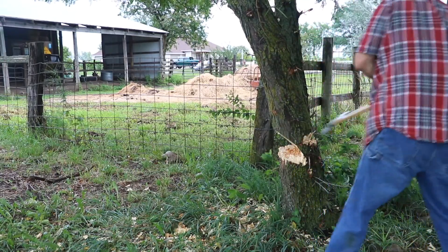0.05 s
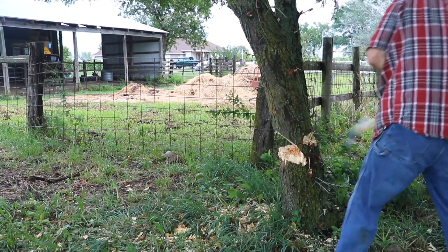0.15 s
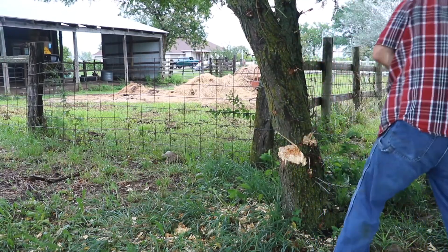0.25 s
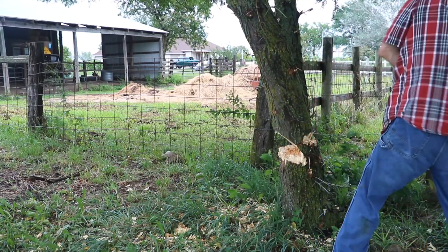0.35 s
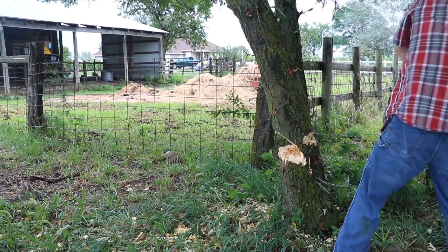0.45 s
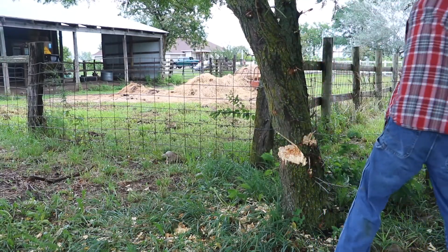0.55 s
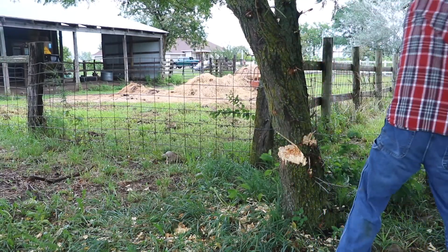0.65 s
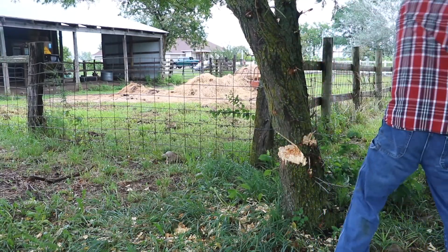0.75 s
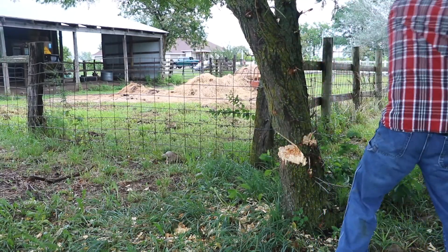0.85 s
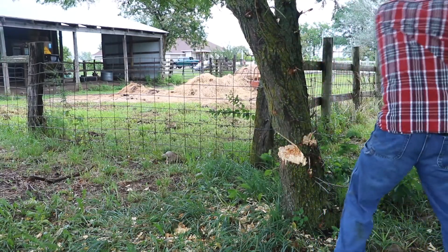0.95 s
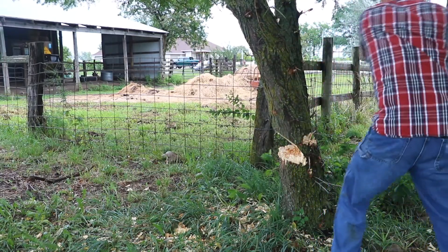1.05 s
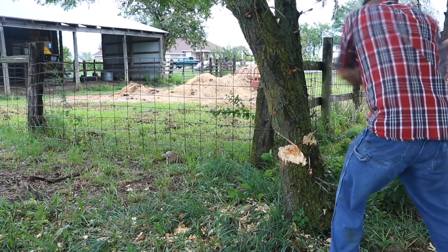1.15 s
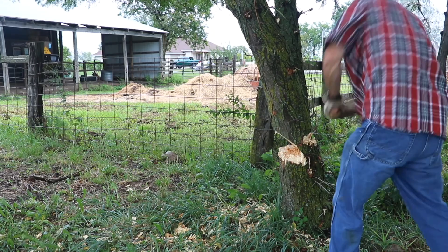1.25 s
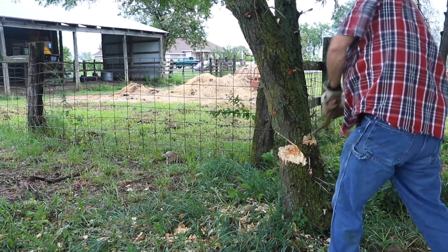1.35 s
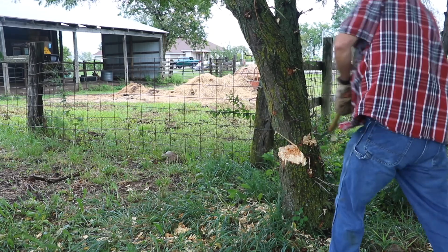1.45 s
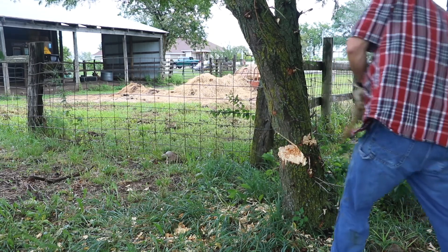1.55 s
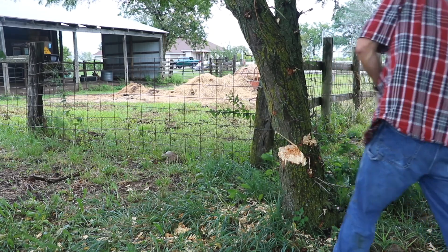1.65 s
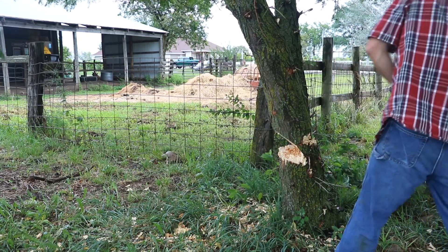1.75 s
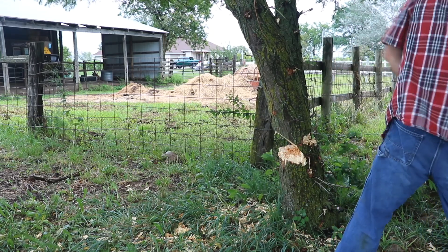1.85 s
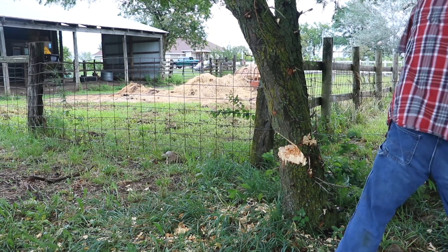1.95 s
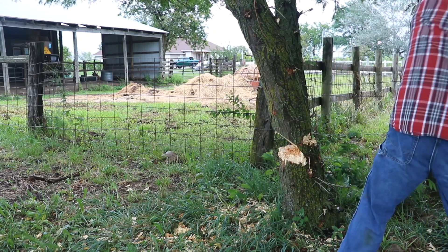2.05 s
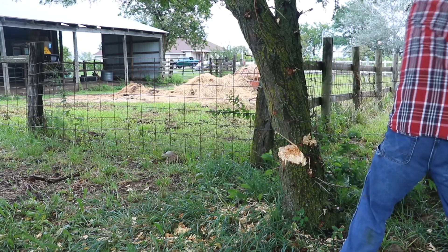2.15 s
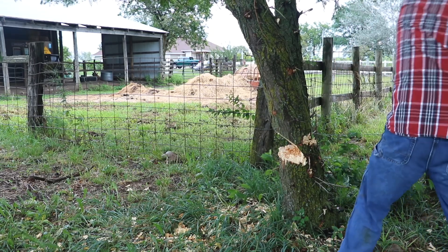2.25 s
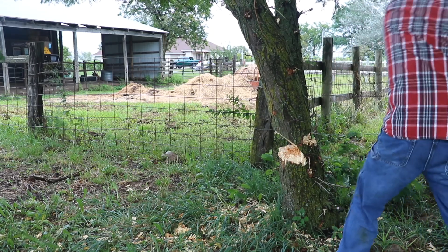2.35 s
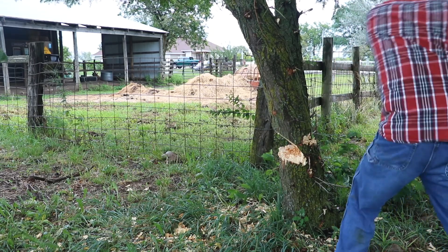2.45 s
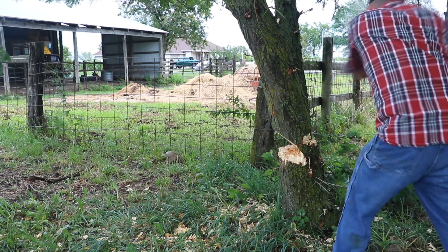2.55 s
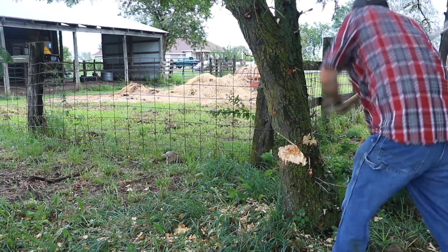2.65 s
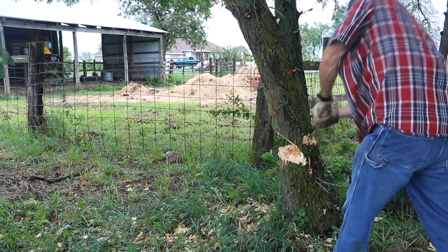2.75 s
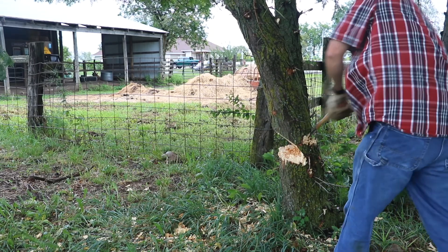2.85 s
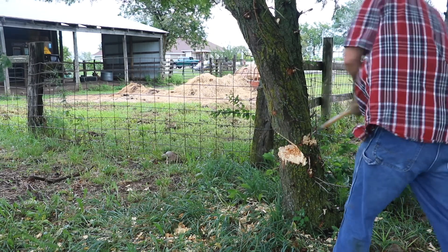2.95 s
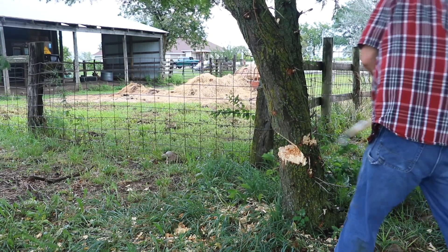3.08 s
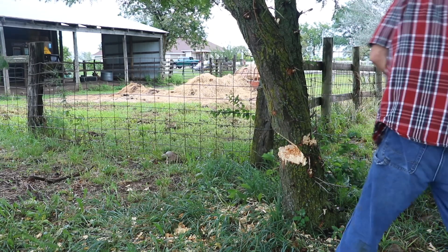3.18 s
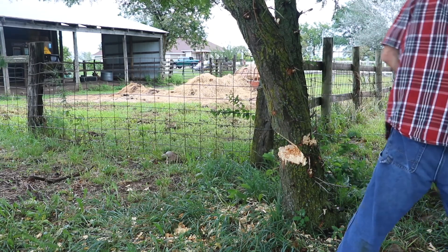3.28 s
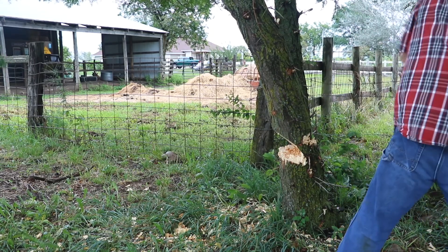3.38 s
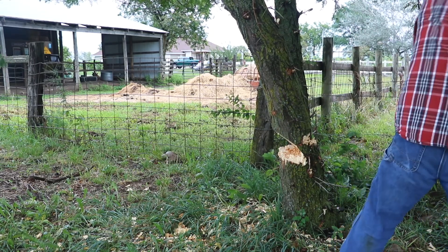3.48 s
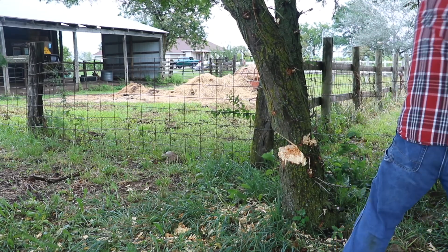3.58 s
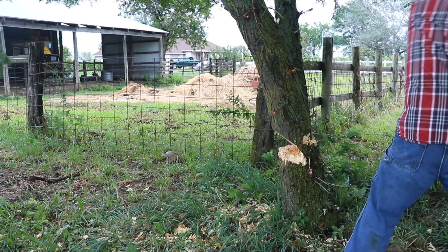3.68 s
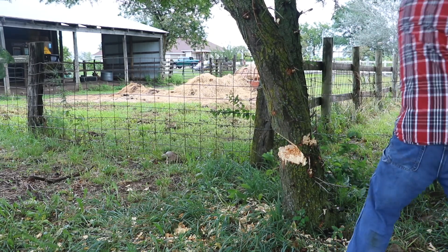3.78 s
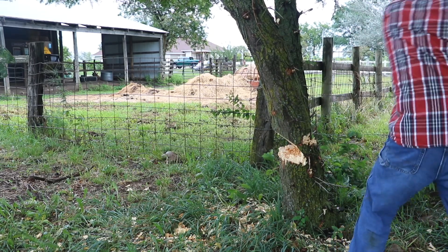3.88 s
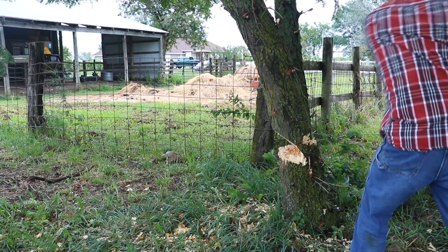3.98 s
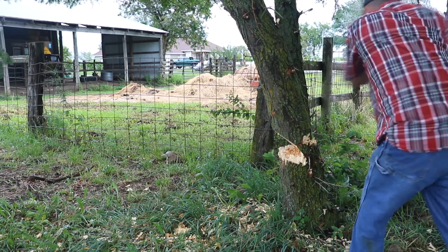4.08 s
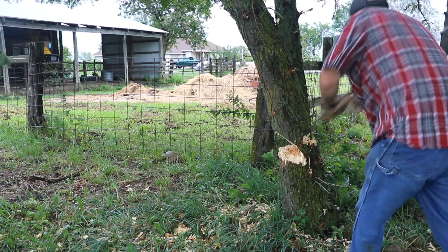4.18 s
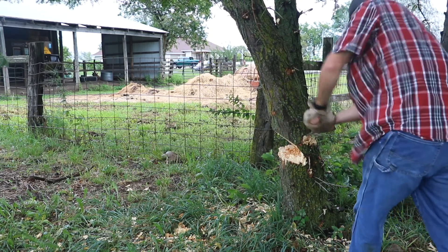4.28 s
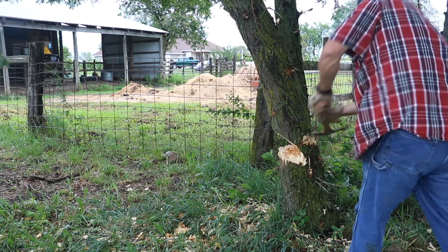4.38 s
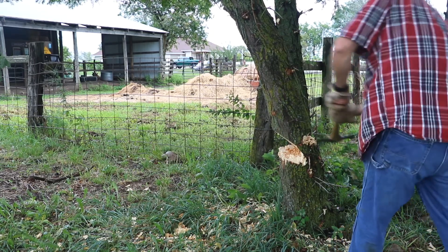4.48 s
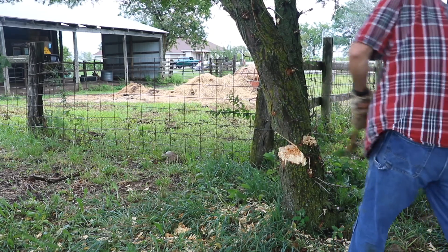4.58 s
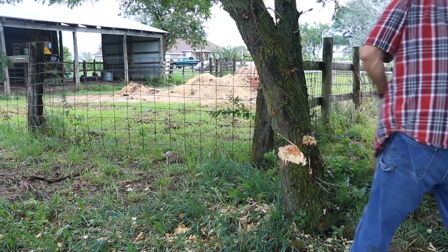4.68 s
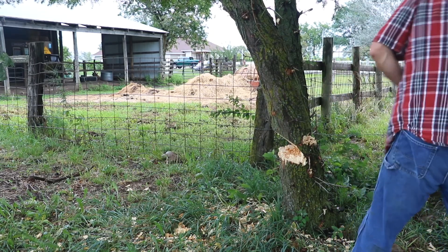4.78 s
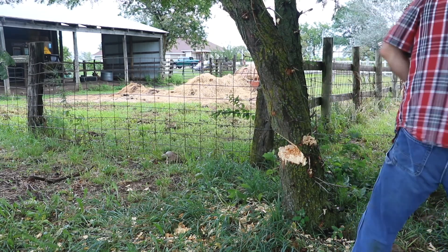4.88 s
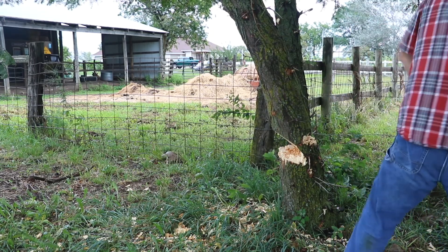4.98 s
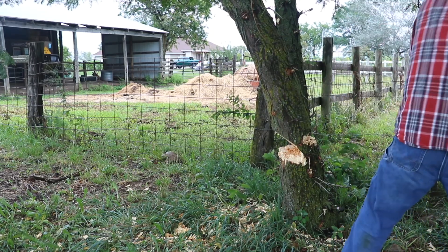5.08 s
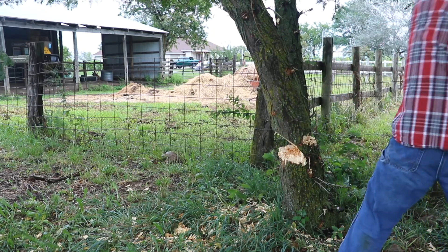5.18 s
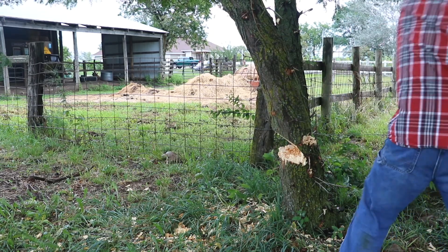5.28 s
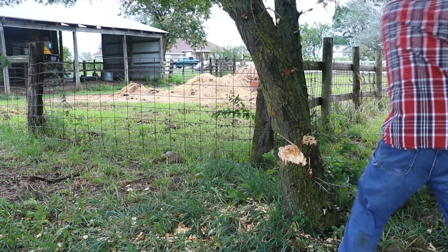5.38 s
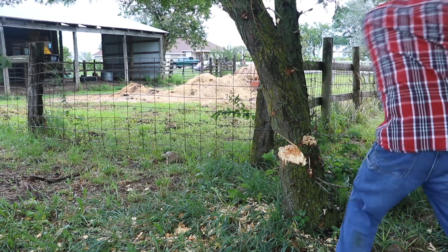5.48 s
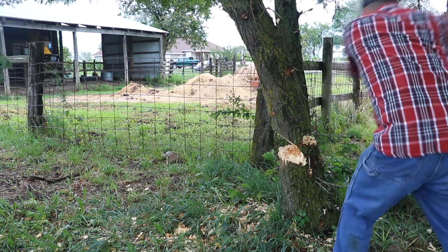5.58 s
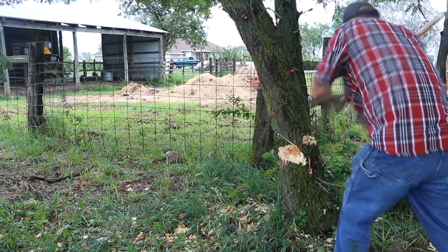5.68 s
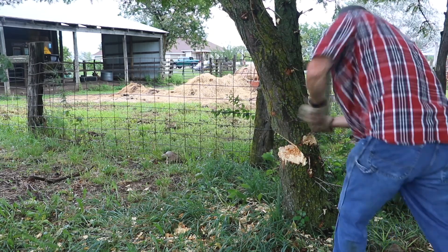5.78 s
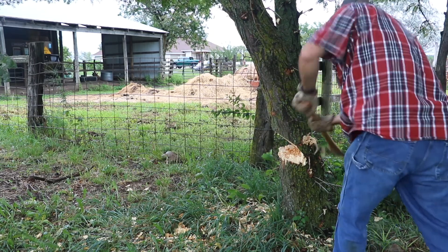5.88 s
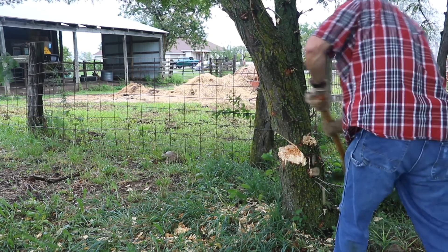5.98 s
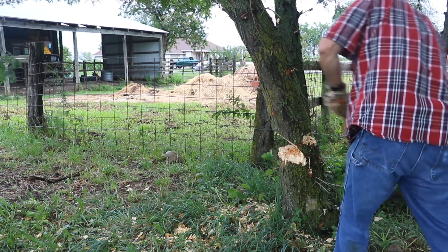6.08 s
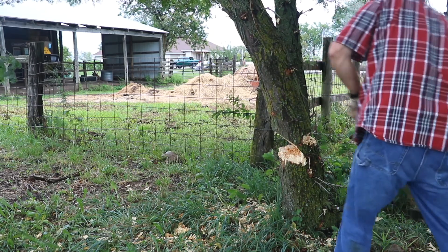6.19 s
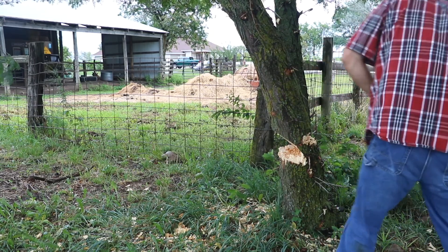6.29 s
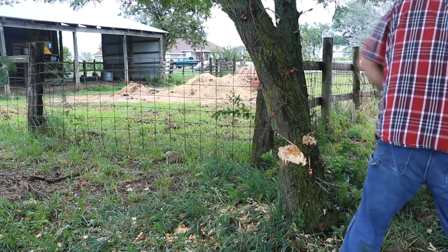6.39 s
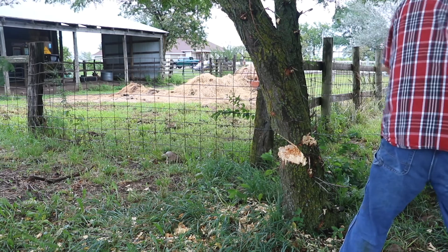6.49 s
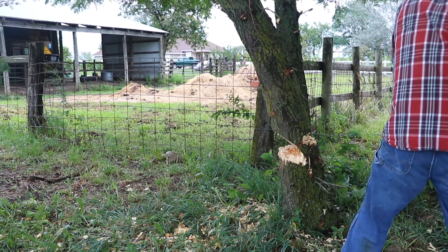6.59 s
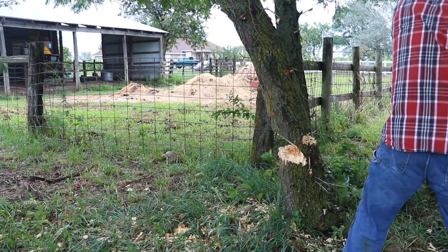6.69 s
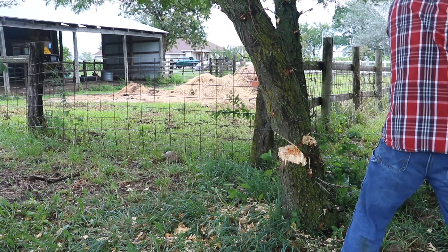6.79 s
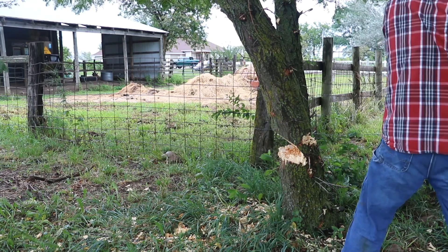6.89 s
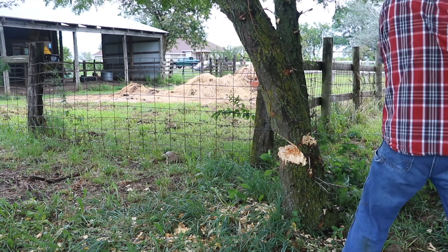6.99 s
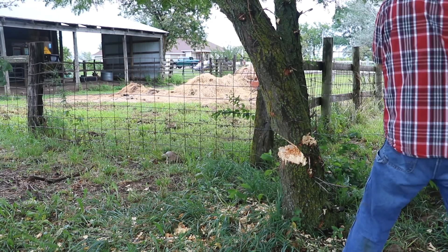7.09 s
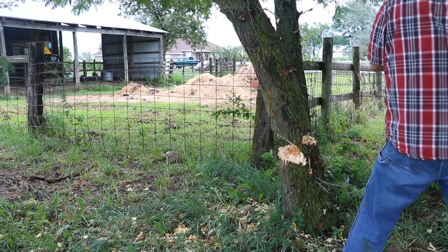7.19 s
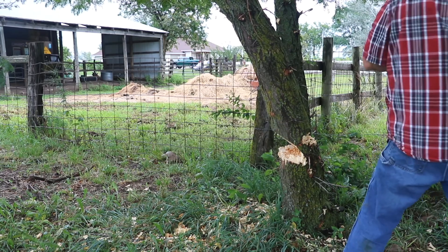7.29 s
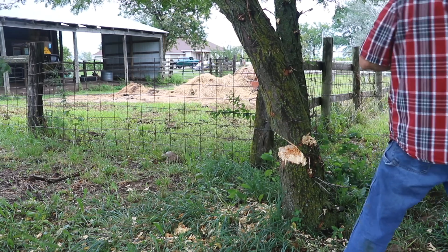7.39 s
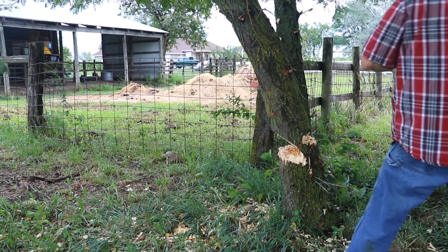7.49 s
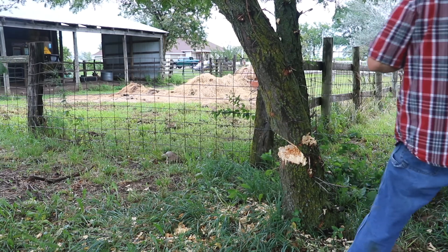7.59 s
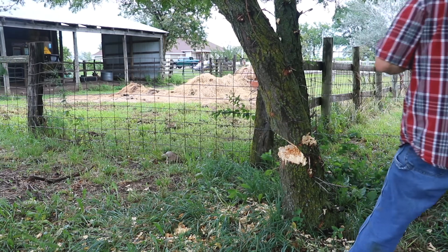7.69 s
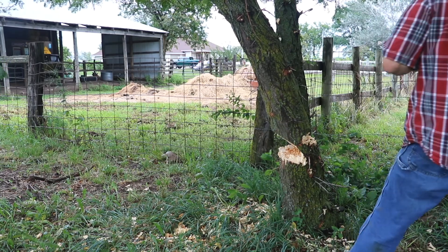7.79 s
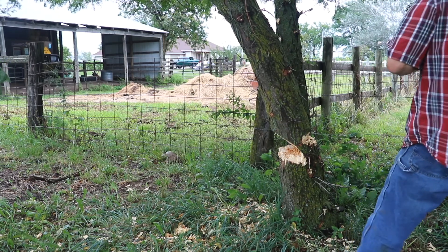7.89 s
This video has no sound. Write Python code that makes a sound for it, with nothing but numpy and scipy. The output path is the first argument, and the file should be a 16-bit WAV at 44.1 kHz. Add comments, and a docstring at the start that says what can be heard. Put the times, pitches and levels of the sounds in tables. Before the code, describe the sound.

An axe chops into a hard tree trunk close to the microphone, at about 1.3, 2.8, 4.3 and 5.8 seconds. Each blow is a loud, sharp crunch with a short woody ring, slightly overloaded, followed by a dull echo from across the farmyard. The last is more splintery, with a deeper thud. Between blows, clothes rustle softly, boots scuff the grass and small twigs tick. At about 6.3 seconds the axe lands in leaves with a hollow knock. Boots then brush through the grass until the end, near 8 seconds, with several dry twig snaps, the sharpest around 6.8 seconds and another at 7.1. Light wind rumbles on the microphone throughout, with small low bumps around 3 seconds and near the end. Faint, high insects buzz steadily behind everything, and a distant bird gives one very faint rising whistle just before 1 second.

```python
"""Four axe chops bite into a hard trunk in a farmyard, loud enough to overload the microphone.
Each blow crushes fibres and rings the wood; grass and fence scatter it and a shed throws it back.
Twigs snap, boots scuff and brush the grass, and clothes rustle with every stroke.
After the last chop the axe lands in the leaves with a hollow knock.
Light wind buffets the microphone; insects buzz and a bird whistles once, far away."""
import sys
import numpy as np
from scipy import signal
from scipy.fft import rfft, irfft, next_fast_len
from scipy.io import wavfile
from scipy.ndimage import uniform_filter1d

SR = 44100
rng = np.random.default_rng(int(sys.argv[2]) if len(sys.argv) > 2 else 0)


def generate_wav(sig):
    """Save sig (samples, or channels by samples) to the path in sys.argv[1] as 16-bit PCM at SR."""
    pcm = np.round(np.clip(np.atleast_2d(sig).T, -1, 1) * 32767).astype(np.int16)
    wavfile.write(sys.argv[1], SR, pcm)


N = 350154

# axe blows: start_s, force_db, bite_s, knock_hz, knock_db, second_knock_hz, second_knock_db,
# chip_hz, chip_db, splinter_db, thud_db, scatter_db
CHOPS = [(1.3040, 3.5, .0036, 1185, 14, 757, 6.5, 5160, 5, 2.5, 2, 2.5),
         (2.7574, 3, 0.0043, 655, 11, 997, 9.5, 1970, 7, -2, 4, 1),
         (4.2692, 3, 0.0043, 760, 9, 1540, 3, 3150, 10, 2.5, 0, -1),
         (5.7971, -5.5, 0.0039, 864, 8.5, 505, 7, 3300, 9, 13.5, 10.5, 0)]
# crushing fibres: freq_hz, level_db
CRUSH_SPECTRUM = [(40, -40.5), (130, -6.5), (280, -9), (520, -11), (750, -5.5), (1150, -7.5), (1450, -6.5),
                  (1800, -4), (3300, -3.5), (4200, -9.5), (5500, -11), (9000, -13), (16000, -23)]
# trunk and axe resonances: pitch_hz, width_hz, gain_db
WOOD_MODES = [(145, 27, 9), (198, 23, 10.5), (360, 43, 2), (603, 91, 7.5), (734, 26, -10), (844, 46, 14.5),
              (1065, 58, 10), (1290, 90, 7.5), (1583, 58, 9), (1765, 70, 8.5), (2020, 160, 5),
              (2120, 33, 6), (2410, 68, 8.5), (2755, 65, 4.5), (3240, 33, 5.5), (3540, 140, -1),
              (3800, 240, 7), (4480, 84, 8.5), (4940, 94, 7.5), (5170, 160, 8), (5870, 93, 7),
              (6650, 80, 8), (8000, 30, 10), (8900, 350, 8.5), (11470, 200, 7)]


def chops(size=8192, knock_octaves=0.11, chip_octaves=0.15, tear_db=-22, tear_s=0.0073):
    """The blade crushes fibres, ringing notch, chip, trunk and axe. Returns direct and outgoing sound."""
    t, hz = np.arange(size) / SR, bins(size)
    direct, outgoing = np.zeros(N), np.zeros(N)
    mode_power = sum(amp(db) ** 2 / (1 + (2 * (hz - pitch_hz) / width_hz) ** 2)
                     for pitch_hz, width_hz, db in WOOD_MODES)
    wood = np.sqrt(1 + mode_power)
    for (start_s, force_db, bite_s, knock_hz, knock_db, second_knock_hz, second_knock_db,
         chip_hz, chip_db, splinter_db, thud_db, scatter_db) in CHOPS:
        bite = swell(t, bite_s, sharpness=5.4)
        tear = amp(tear_db) * swell(t, tear_s, sharpness=1)
        crush = burst(bite + tear, evenness=0.64)
        colour_db = splinter_db * hump(hz, 8200, 0.7) + thud_db * hump(hz, 290, 0.64)
        fibres = amp(force_db + value_at(CRUSH_SPECTRUM, hz) + colour_db)
        knocks_db = knock_db * hump(hz, knock_hz, knock_octaves)
        knocks_db += second_knock_db * hump(hz, second_knock_hz, knock_octaves)
        chip_ring_db = chip_db * hump(hz, chip_hz, chip_octaves)
        notch = wood * amp(knocks_db + chip_ring_db)
        add(direct, start_s, ring(crush, fibres * notch))
        # over all directions the trunk's peaks even out, while the chip's ring carries
        radiated = fibres * notch ** 0.4 * amp(0.28 * chip_ring_db)
        add(outgoing, start_s, amp(scatter_db) * ring(crush, radiated))
    return direct, outgoing


# near reflections: freq_hz, level_db
SCATTER_SPECTRUM = [(80, 0), (400, 10.5), (900, 1.5), (2000, 0), (5000, 2), (9000, 1.5), (16000, 6)]
# their decay: freq_hz, t60_s
SCATTER_DECAY = [(100, 0.11), (800, 0.2), (3000, .24), (8000, 0.27), (16000, 0.15)]


def scatter(x, level_db=-15, onset_s=0.0077, taps_per_s=5000, size=16384):
    """Many small reflections off nearby grass, fence and branches."""
    t = np.arange(size) / SR
    taps = rng.choice([-1., 1.], size) * (rng.random(size) < taps_per_s / SR)
    taps *= 1 - np.exp(-(t / onset_s) ** 2)
    hz, frame_s, frames = signal.stft(taps, SR, nperseg=256)
    colour_db = value_at(SCATTER_SPECTRUM, hz)[:, None]
    decay_db = 60 * frame_s / value_at(SCATTER_DECAY, hz)[:, None]
    tail = signal.istft(frames * amp(colour_db - decay_db), SR)[1]
    return reflect(x, tail, level_db)


# far reflections: freq_hz, level_db
ECHO_SPECTRUM = [(100, 9), (450, -4.5), (800, 6.5), (1700, 1.5), (3500, -1), (5500, -1.5), (9000, -13),
                 (16000, -5.5)]
# their envelope: delay_s, level_db
ECHO_ENVELOPE = [(0, -38), (.07, -15), (.125, 6.5), (.16, 4), (.195, 7), (.25, 0.5), (.35, -3), (.6, -25),
                 (1, -47)]


def echo(x, level_db=-27):
    """Shed and tree line answer late and dull."""
    envelope = amp(curves(ECHO_ENVELOPE, size=SR)[0])
    return reflect(x, envelope * tint(rng.standard_normal(SR), ECHO_SPECTRUM), level_db)


# dry twigs and chips: start_s, level_db, centre_hz, width_octaves, decay_s, crackle_db
SNAPS = [(0.079, -22, 6000, 1.9, 0.0023, -20), (0.362, -28, 6000, 1.8, 0.0012, -19),
         (0.846, -34.5, 7950, 2.3, 0.0016, -13), (1.057, -28.5, 7250, 0.57, 0.0011, -24),
         (1.216, -37, 10000, .8, .001, -24), (1.576, -27, 5500, 0.49, 0.0019, -29.5),
         (2.102, -37, 7000, 1.4, 0.0012, -22), (2.435, -38, 9000, 1.3, .003, -13),
         (2.516, -31.5, 1930, 3.8, 0.0014, -14), (3.213, -28, 9600, 1.3, 0.0032, -13),
         (3.528, -36, 9900, 0.66, .001, -26), (3.876, -28, 6100, 1.5, 0.0026, -11),
         (3.908, -30, 5000, 1.3, .0012, -16), (3.931, -24.5, 10700, 1.6, 0.0011, -26),
         (4.096, -36, 10000, .5, .001, -26), (4.224, -14, 2920, 3.9, 0.0037, -10.5),
         (4.453, -37, 11000, .7, 0.0024, -14), (5.012, -39, 9060, 0.53, .001, -4),
         (5.112, -33, 8700, 0.91, 0.0012, -26), (5.567, -31.5, 5040, 2.9, 0.0018, -21),
         (5.861, -25, 1500, 2.2, .003, -24), (5.915, -30.5, 2980, 1.8, .003, -12),
         (5.931, -27.5, 3000, 1.4, .002, -22), (6.095, -40, 5000, 1.8, .001, -27),
         (6.2571, -14.5, 7900, 0.5, 0.0008, -32), (6.66, -24.5, 8350, 1.1, 0.0019, -28),
         (6.7613, -13.5, 4740, 2.9, 0.0048, -11.5), (6.8495, -6.5, 3540, 1.27, 0.0026, -32),
         (6.9164, -25, 4130, 1.4, 0.0024, -22), (7.1243, -24.5, 9000, 1.1, 0.00095, -22),
         (7.1291, -14.5, 7800, 0.72, 0.0013, -35), (7.454, -27, 2450, 1.8, 0.00086, -28),
         (7.756, -24.5, 6040, 3.5, 0.001, -32)]
# bending modes of a stick: ratio_to_centre, gain_db
STICK_MODES = [(.43, 8.5), (.67, 5), (.95, 5), (1.18, 3), (1.6, 4)]


def twig_snaps(size=4096, break_db=8, break_s=0.00019, crackle_s=0.063, cutoff_hz=14000):
    """A sudden break rings the stick over a dull woody body, then a few fibres let go."""
    t, hz, out = np.arange(size) / SR, bins(size), np.zeros(N)
    body = 0.077 * hump(hz, 1500, 1.8) + 0.008
    lowpass = 1 / np.hypot(1, (hz / cutoff_hz) ** 4)
    for start_s, level_db, centre_hz, width_octaves, decay_s, crackle_db in SNAPS:
        fracture = amp(break_db) * np.exp(-t / break_s) + np.exp(-t / decay_s)
        crackle = amp(crackle_db) * np.exp(-t / crackle_s)
        crack = burst(fracture + crackle, evenness=0.13)
        modes_db = sum(db * hump(hz, ratio * centre_hz, 0.19) for ratio, db in STICK_MODES)
        stick = unit(amp(modes_db) * hump(hz, centre_hz, width_octaves) + body)
        add(out, start_s, amp(level_db) * ring(crack, stick * lowpass))
    return out


def ground_bounce(x, level_db=-8, decay_s=0.0056, size=2048):
    """A sound on the ground plus its instant bounce off leaves and roots."""
    t = np.arange(size) / SR
    tail = rng.standard_normal(size) * swell(t, decay_s, sharpness=0.33) * np.exp(-t / decay_s)
    return x + reflect(x, tail, level_db)


# rubs of boots, gloves and handle, and a hollow knock as the axe lands in the leaves (last five rows):
# start_s, level_db, rise_s, centre_hz, width_octaves
RUBS_AND_KNOCK = [(0.103, -39.5, 0.0072, 1550, 0.41), (1.280, -32, 0.0035, 1240, 0.26),
                  (1.785, -41.5, 0.0097, 1400, 1.15), (1.827, -41, 0.0076, 1400, 1.5),
                  (1.885, -41.5, 0.011, 1310, 0.65), (2.097, -42.5, 0.01, 940, 0.87),
                  (2.514, -38, 0.0029, 1470, 0.82), (2.663, -40.5, 0.0076, 1500, 1.3),
                  (2.72, -42, 0.0033, 1400, 0.96), (2.742, -33, 0.0034, 1290, 1),
                  (3.021, -38, 0.01, 1600, 0.84), (3.25, -40, 0.0058, 1310, 1.06),
                  (3.402, -40.5, 0.0062, 1360, 0.66), (4.215, -39, 0.0054, 1300, 1.1),
                  (4.62, -39.5, 0.0099, 1290, 0.7), (4.673, -39, 0.0052, 1260, 0.5),
                  (4.762, -35.5, 0.0044, 1290, 0.52), (5.448, -44, 0.0034, 1400, 0.83),
                  (5.477, -40.5, 0.0064, 1360, 0.85), (5.581, -39.5, 0.0031, 1210, 0.86),
                  (6.283, -31.5, 0.012, 1210, 1.04), (6.287, -23, 0.0051, 1740, 0.14),
                  (6.289, -19.5, 0.0044, 882, 0.11), (6.291, -32, .006, 423, 0.75),
                  (6.331, -27, 0.0061, 710, 0.54)]


def rubs_and_knock(size=8192):
    """Brief contacts ring one resonance each: faint rubs, then a cluster for the axe's hollow knock."""
    t, out = np.arange(size) / SR, np.zeros(N)
    for start_s, level_db, rise_s, centre_hz, width_octaves in RUBS_AND_KNOCK:
        contact = burst(swell(t, rise_s, sharpness=1.05))
        resonance = unit(hump(bins(size), centre_hz, width_octaves) + 0.0024)
        add(out, start_s, amp(level_db) * ring(contact, resonance))
    return out


# raise, swing, pull free, step back: offset_from_chop_s, rise_s, fall_s, hiss_db, body_db
STROKE_MOVES = [(-.3, 0.038, 0.021, -48, -59), (-.02, 0.046, 0.059, -47, -44.5), (.49, .05, .1, -52, -51.5),
                (.9, 0.041, 0.056, -52, -51.5)]
# boots and axe through grass: peak_s, rise_s, fall_s, hiss_db, body_db
GRASS_BRUSHES = [(.02, 0.04, 0.2, -47, -45), (.42, 0.1, 0.29, -40.5, -67),
                 (1.055, 0.06, 0.09, -44.5, -48.5), (2.28, 0.022, 0.05, -67, -45),
                 (3.895, 0.021, 0.029, -40.5, -45), (5.46, 0.04, 0.065, -47, -58),
                 (6.343, 0.0089, 0.038, -40, -32.5), (6.39, 0.059, 0.17, -33, -56),
                 (6.79, 0.12, 0.16, -41.5, -62), (7.02, 0.11, 0.26, -46, -65),
                 (7.29, 0.018, .025, -41.5, -57), (7.43, 0.023, 0.035, -48, -45),
                 (7.63, 0.036, 0.048, -33.5, -39), (7.74, 0.056, 0.12, -38.5, -52)]
# rubbing cloth and leaves: freq_hz, level_db
HISS_SPECTRUM = [(600, -4), (2000, 1.5), (3500, 0.5), (6000, -1.5), (8500, 0.5), (12000, -5),
                 (16000, -17.5)]
# low body of the rustle: freq_hz, level_db
BODY_SPECTRUM = [(150, 0), (400, 2.5), (900, 2), (2200, -3.5), (3500, -6), (6000, -35), (12000, -61)]


def rustle(gain_db=-1, rest_hiss_db=-52.5, rest_body_db=-49.5, grains_per_s=1500):
    """Cloth and leaves rub in small grains; the litter underfoot gives way in lumps."""
    strokes = [(chop[0] + offset_s, *move) for chop in CHOPS for offset_s, *move in STROKE_MOVES]
    hiss_power, body_power = amp(rest_hiss_db) ** 2, amp(rest_body_db) ** 2
    for peak_s, rise_s, fall_s, hiss_db, body_db in strokes + GRASS_BRUSHES:
        motion = surge(peak_s, rise_s, fall_s)
        hiss_power += (amp(hiss_db) * motion) ** 2
        body_power += (amp(body_db) * motion) ** 2
    grains = rng.standard_normal(N) * amp(7 * np.minimum(rng.exponential(1, N), 4))
    grains *= rng.random(N) < grains_per_s / SR
    fizz = unit(noise(HISS_SPECTRUM) + 0.43 * unit(tint(grains, HISS_SPECTRUM)))
    flutter = drift(rate_hz=47)
    hiss = np.sqrt(hiss_power) * amp(1.07 * flutter) * fizz
    body = np.sqrt(body_power) * amp(3 * flutter) * noise(BODY_SPECTRUM)
    return amp(gain_db) * (hiss + body)


# rumble at the microphone: freq_hz, level_db
WIND_SPECTRUM = [(15, -37), (40, -3.5), (85, 4.5), (135, 2), (200, -7.5), (300, -15.5), (450, -25.5),
                 (900, -34), (3000, -90)]
# breeze strength: time_s, level_db
BREEZE = [(0, -44.5), (.72, -36.5), (.92, -45), (1.3, -47.5), (1.6, -47.5), (2.0, -46.5), (2.3, -42.5),
          (2.9, -46.5), (3.65, -46), (4.2, -54), (4.6, -57), (5.05, -46.5), (5.55, -48.5), (6.05, -60),
          (6.65, -44.5), (7.02, -48), (7.3, -39), (7.93, -44)]
# gusts on top: peak_s, level_db, half_width_s
GUSTS = [(.13, -37, 0.032), (0.323, -30.5, 0.038), (0.564, -35, 0.0096), (0.646, -37, 0.038),
         (1.792, -35.5, 0.026), (2.26, -40, 0.017), (2.984, -18, 0.011), (3.235, -23, 0.016),
         (3.357, -30.5, 0.024), (3.83, -39.5, .028), (4.711, -32, 0.012), (4.89, -36.5, .03),
         (5.659, -28, 0.03), (5.784, -30, 0.026), (6.215, -34.5, 0.0087), (6.33, -37, 0.03),
         (6.733, -31.5, 0.023), (7.355, -28, .035), (7.645, -29.5, 0.024), (7.85, -29.5, 0.074)]
# single eddies: peak_s, level_db, half_width_s
EDDIES = [(.342, -22, 0.0011), (.632, -21, 0.0011), (3.348, -13, 0.002), (5.246, -23.5, 0.00094),
          (5.283, -22, 0.0022), (5.667, -20.5, 0.00088), (5.682, -16.5, .0016), (7.333, -18, 0.0012),
          (7.831, -12.5, 0.0011), (7.894, -5, 0.0019)]


def wind(rumble_gain_db=-1, lump_db=3, size=2048):
    """Lumpy rumble follows breeze and gusts; single eddies push the diaphragm in and out."""
    rumble = noise(WIND_SPECTRUM)
    rumble /= np.sqrt(uniform_filter1d(rumble ** 2, size=3000) + 1e-6)
    breeze_power = amp(curves(BREEZE)[0]) ** 2
    gust_power = sum((amp(db) * surge(peak_s, half_s, half_s)) ** 2 for peak_s, db, half_s in GUSTS)
    lumps = amp(rumble_gain_db + lump_db * drift(rate_hz=32))
    out = np.sqrt(breeze_power + gust_power) * lumps * rumble
    t = (np.arange(size) - size / 2) / SR
    for peak_s, level_db, half_width_s in EDDIES:
        spread = (t / half_width_s) ** 2
        push = (1 - spread) / (1 + spread / 3) ** 3
        add(out, peak_s + t[0], amp(level_db) * push)
    return out


# rising whistle: time_s, pitch_hz, level_db
WHISTLE = [(.80, 1635, -75), (.825, 1690, -50), (.87, 1790, -44), (.91, 2040, -49), (.93, 2130, -75)]


def bird(waver_hz=18):
    """One thin, far whistle glides upward."""
    pitch_hz, level_db = curves(WHISTLE)
    t = np.arange(N) / SR
    sounding = (t > WHISTLE[0][0]) & (t < WHISTLE[-1][0])
    phase = 2 * np.pi * np.cumsum(pitch_hz + waver_hz * drift(rate_hz=83)) / SR
    return sounding * amp(level_db) * np.sin(phase)


# near insects: pitch_hz, width_hz, peak_db, chirps_per_s
CHIRPERS = [(7240, 120, -57, 4.1), (8250, 70, -57, 2.3)]
# far insects: pitch_hz, width_hz, level_db, swells_per_s, depth_db
CHORUS = [(7250, 940, -53.5, 0.21, 0), (3470, 660, -58, 0.426, -0.5)]


def insects(wander_rad=0.86):
    """Two insects rasp in loosely timed chirps over a nearly steady chorus."""
    t, out = np.arange(N) / SR, np.zeros(N)
    for pitch_hz, width_hz, peak_db, chirps_per_s in CHIRPERS:
        rasp = noise_band(pitch_hz, width_hz)
        phase = 2 * np.pi * chirps_per_s * t + wander_rad * drift(rate_hz=2.3)
        out += amp(peak_db) * rasp * np.cos(phase / 2) ** 2
    for pitch_hz, width_hz, level_db, swells_per_s, depth_db in CHORUS:
        rasp = noise_band(pitch_hz, width_hz)
        phase = 2 * np.pi * swells_per_s * t + wander_rad * drift(rate_hz=6.9)
        out += amp(level_db + depth_db * np.sin(phase)) * rasp
    return out


# still air of the yard: freq_hz, level_db
AIR_SPECTRUM = [(18, -28), (30, 6.5), (88, 5.5), (134, -7.5), (239, -12.5), (355, -6.5), (844, -10),
                (1630, -8.5), (3400, -17), (5310, -19.5), (8000, -37), (12600, -28), (14800, -30),
                (16000, -47)]


def air(level_db=-50, flicker_db=1.5):
    """A faint, low hush whose level flickers."""
    return amp(level_db + flicker_db * drift(rate_hz=30)) * noise(AIR_SPECTRUM)


def amp(db):
    """Decibels to gain."""
    return 10 ** (np.asarray(db) / 20)


def unit(x):
    """Scales to rms 1."""
    return x / np.sqrt(np.mean(x ** 2) + 1e-20)


def value_at(points, hz):
    """Interpolates a table on a log-frequency axis."""
    freq_hz, value = np.transpose(points)
    return np.interp(np.log(hz + 1), np.log(freq_hz + 1), value)


def curves(rows, size=N):
    """The columns of a time table, one value a sample."""
    time_s, *columns = np.transpose(rows)
    return [np.interp(np.arange(size) / SR, time_s, column) for column in columns]


def add(mix, start_s, sound):
    """Mixes a sound in at start_s."""
    part = mix[max(round(start_s * SR), 0):][:len(sound)]
    part += sound[:len(part)]


def bins(size):
    """Frequencies of a real spectrum."""
    return np.fft.rfftfreq(size, 1 / SR)


def hump(hz, centre_hz, octaves):
    """A bell of height 1 on the octave axis."""
    return np.exp(-.5 * (np.log2((hz + 1) / centre_hz) / octaves) ** 2)


def swell(t, peak_s, sharpness):
    """Rises from 0 to 1 at peak_s and dies away."""
    return (t / peak_s * np.exp(1 - t / peak_s)) ** sharpness


def surge(peak_s, rise_s, fall_s):
    """A bell in scene time, 1 at peak_s, with its own width on each side."""
    t = np.arange(N) / SR - peak_s
    width_s = np.where(t < 0, rise_s, fall_s)
    return np.exp(-.5 * np.minimum((t / width_s) ** 2, 100))


def tint(x, points):
    """Filters a long sound by a spectrum table."""
    size = next_fast_len(len(x), True)
    return irfft(rfft(x, size) * amp(value_at(points, bins(size))), size)[:len(x)]


def ring(x, gain):
    """Minimum-phase filter: each peak of the gain rings on after its excitation."""
    log_gain = np.log(np.maximum(gain, 1e-4))
    mirrored = np.r_[log_gain, log_gain[-2:0:-1]]
    response = np.exp(np.conj(signal.hilbert(mirrored)))
    return irfft(rfft(x) * response[:len(gain)])


def reflect(x, tail, level_db):
    """Convolves with a tail whose energy is set to level_db."""
    return amp(level_db) * signal.fftconvolve(x, tail / np.linalg.norm(tail))[:N]


def noise(points):
    """Steady noise of rms 1, shaped by a spectrum table."""
    return unit(tint(rng.standard_normal(N), points))


def noise_band(centre_hz, width_hz):
    """Narrow-band noise of rms 1."""
    size = next_fast_len(N, True)
    band = 1 / np.hypot(1, ((bins(size) - centre_hz) / width_hz) ** 2)
    return unit(irfft(rfft(rng.standard_normal(size)) * band, size)[:N])


def drift(rate_hz, size=4096):
    """Slow random wander, rms about 1."""
    hz = np.arange(size // 2 + 1) * SR / N
    slow = unit(irfft(rfft(rng.standard_normal(size)) * np.exp(-(hz / rate_hz) ** 2)))
    return np.interp(np.arange(N) * size / N, np.arange(size), slow)


def burst(envelope, evenness=0.36):
    """A rush of tiny fractures under an envelope; evenness (0 to 1) flattens its spectrum."""
    spectrum = rfft(rng.standard_normal(len(envelope)) * envelope)
    flattened = irfft(spectrum / (abs(spectrum) + 1e-9) ** evenness)
    return unit(flattened * envelope ** .25) * np.sqrt(np.mean(envelope ** 2))


def scene(snap_gain_db=-4, small_scatter_db=1, chop_scatter_db=6, chop_echo_db=7):
    """Chops and small sounds reflect around the yard, over rustle, wind, air and insects. Mono."""
    direct, outgoing = chops()
    small = amp(snap_gain_db) * ground_bounce(twig_snaps()) + rubs_and_knock() + bird()
    near = scatter(amp(chop_scatter_db) * outgoing + amp(small_scatter_db) * small)
    far = echo(amp(chop_echo_db) * outgoing + small)
    return (direct + small + near + far + rustle() + wind() + air() + insects())[None]


def record(dry, threshold_db=-9, slope=0.95, recovery_db_per_s=11, attack_s=0.078, cutoff_hz=16000):
    """Chops overload the input; gain control reacts late and ducks what follows; then a low-pass."""
    power = uniform_filter1d(np.clip(dry[0], -1, 1) ** 2, size=64)
    level_db = 10 * np.log10(abs(power) + 1e-12)
    demand_db = slope * np.maximum(level_db - threshold_db, 0)
    recovery_db = recovery_db_per_s * np.arange(N) / SR
    duck_db = np.maximum.accumulate(demand_db + recovery_db) - recovery_db
    lag = np.exp(-1 / (attack_s * SR))
    ducked = dry / amp(signal.lfilter([1 - lag], [1, -lag], duck_db))
    saturated = ducked / (1 + abs(ducked / 1.08) ** 8) ** (1 / 8)
    lowpass = signal.firwin(401, cutoff_hz, window=("kaiser", 8), fs=SR)
    return signal.oaconvolve(saturated, lowpass[None], "same")


dry = scene()
out = record(dry)
generate_wav(out)
```